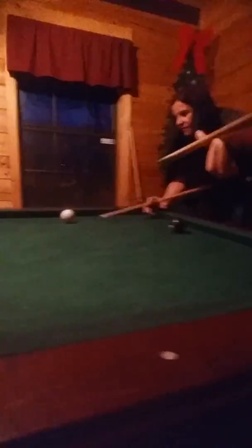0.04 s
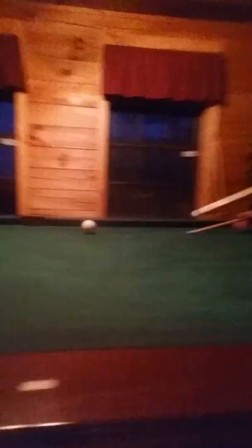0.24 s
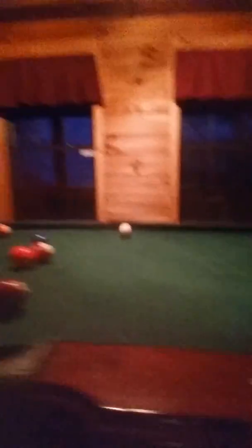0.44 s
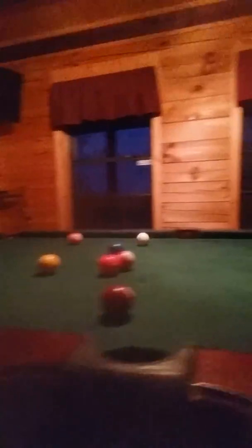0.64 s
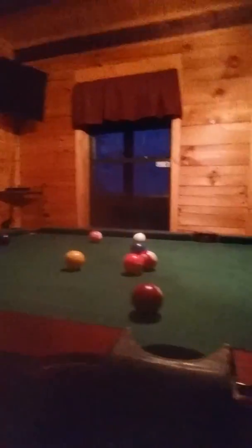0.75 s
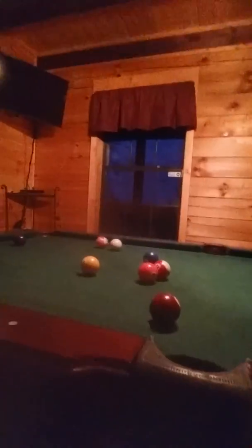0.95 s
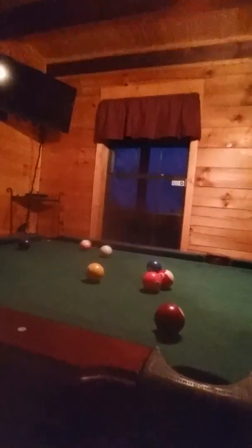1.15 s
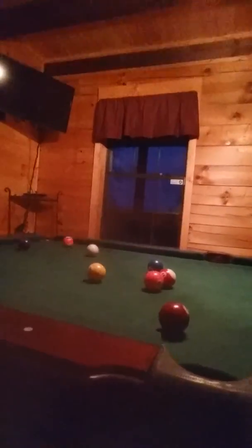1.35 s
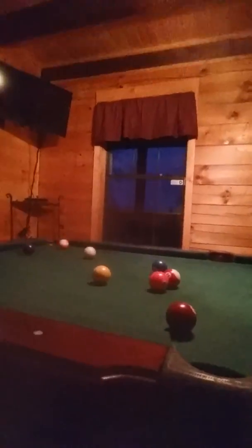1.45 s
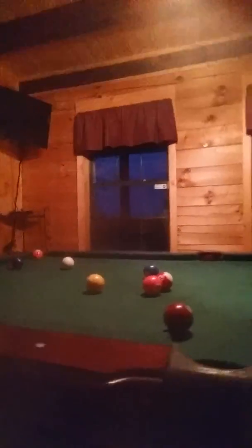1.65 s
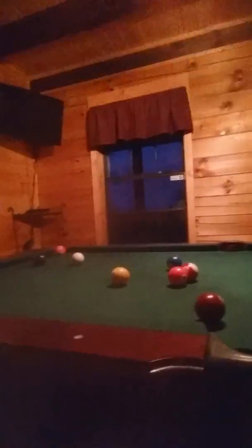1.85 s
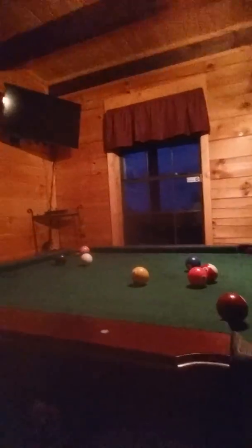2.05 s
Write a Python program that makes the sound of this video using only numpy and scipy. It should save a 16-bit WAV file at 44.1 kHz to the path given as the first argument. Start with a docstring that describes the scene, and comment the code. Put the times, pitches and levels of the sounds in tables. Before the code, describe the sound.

Sharp cue strike on a pool ball, low rolling, then one hard ball-on-ball click in a wooden room

```python
"""In a wood-panelled room, a pool table is heard through a hand-held phone.
A cue's blow rings through table and room, a ball rolls on the slate, clicks against another, and one thuds
into a cushion. Blows and clicks are short pulses with fading tones; cracks and room are shaped, dying noise.
Close to the phone, dry ticks are tiny fading tones with a noise snap. Underneath lie a rolling rumble made
of a wavering hum and filtered noise, steady microphone hiss, and thin whistles that come and go."""
import sys
import numpy as np
from scipy import signal
from scipy.fft import rfft, irfft
from scipy.io import wavfile
from scipy.ndimage import uniform_filter1d

SR = 44100
rng = np.random.default_rng(int(sys.argv[2]) if len(sys.argv) > 2 else 0)


def natural_amplitude(level_db):
    """Convert a level in decibels to a linear amplitude factor, elementwise."""
    exponent = np.asarray(level_db, float) / 20
    return 10 ** exponent


def int16_out(signal):
    """Quantize to a 16-bit WAV file."""
    q = np.round(np.clip(np.atleast_2d(signal).T, -1, 1) * 32767)
    wavfile.write(sys.argv[1], SR, q.astype(np.int16))


N = 92169  # length in samples
LEAD = 1024  # spare samples ahead of time zero, for sounds that start just before it

# How fast the room dies away. Each row: pitch in Hz, time to fall 60 dB in seconds.
ROOM_DECAY = [(100, 0.2), (250, 0.55), (600, 0.46), (1200, 0.44), (2500, 0.34), (5000, 0.37), (9000, 0.21),
              (15000, 0.16)]
# How alike left and right are. Each row: pitch in Hz, likeness (1 same, 0 unrelated, below 0 opposed).
LEFT_RIGHT_LIKENESS = [(100, .87), (250, 0.97), (500, 0.57), (1000, -0.11), (4000, 0.025), (12000, 0.33)]
# Rolling balls and room rumble over time.
# Each row: time in seconds, hum level in dB, broad roll level in dB, slate drone level in dB.
ROLL_LEVELS = [(0.298, -58, -61, -39.5), (0.383, -48, -56, -48.5), (.494, -36.5, -59.5, -39.5),
               (.534, -51, -48.5, -48), (.6, -42, -74, -43), (.738, -39.5, -51, -46), (.86, -52, -54, -41),
               (.96, -46, -53.5, -43.5), (1.096, -55, -51.5, -47), (1.243, -47, -56.5, -49.5),
               (1.5, -42, -54.5, -50), (1.676, -50.5, -52.5, -48), (1.731, -70, -56, -51.5),
               (1.802, -35.5, -48, -46.5), (1.86, -36, -51.5, -58.5), (1.98, -64.5, -57.5, -47),
               (2.09, -52.5, -55.5, -50)]
# Colour of the broad roll. Each row: pitch in Hz, relative level in dB.
ROLL_COLOUR = [(25, -28.5), (45, -24), (60, -10), (100, -10.5), (200, -20.5), (350, -19), (520, -14),
               (750, -26.5), (1100, -32.5), (1600, -41.5), (3000, -66.5)]
# Resonances of the slate's drone. Each row: pitch in Hz, width in Hz, relative level in dB.
DRONE_PEAKS = [(122, 13, 4.5), (210.9, 23, -0.5), (254, 25, -3)]
# Colour of the microphone hiss. Each row: pitch in Hz, relative level in dB.
HISS_COLOUR = [(700, -6), (1200, -5), (2000, -5), (3300, -9.5), (4700, -12), (6500, -5.5), (8500, -16.5),
               (11000, -15), (15800, -10.5)]
# Extra treble loss of the hiss. Each row: pitch in Hz, loss in dB before each side's own multiplier.
HISS_LOSS = [(4000, 0.03), (8500, 2), (13000, 0)]
# Thin whistles. Each row: start in seconds, end in seconds, level in dB, pitch in Hz.
WHISTLES = [(0.13, 0.166, -70, 14900), (0.51, .85, -77, 6150), (0.943, 0.973, -85, 6040),
            (1.236, 1.325, -75.5, 6100), (2.057, 2.09, -76, 6140)]
# Dry ticks near the phone.
# Each row: start in seconds, level in dB, pitch in Hz, time to fall 60 dB in seconds, left over right in dB.
TICKS = [(1.5821, -26.5, 5300, 0.0012, -18.5), (1.584, -29, 2760, 0.0031, 6.5),
         (1.5843, -27, 1140, 0.0092, -11.5), (1.5954, -38, 2260, 0.0029, -12.5),
         (1.598, -31.5, 1940, 0.0043, -15.5), (1.5972, -29.5, 1340, 0.0071, -6),
         (1.6, -34, 4660, 0.0011, -15), (1.5982, -53, 10000, .002, -6), (1.974, -55, 6200, 0.0058, 18)]
# Ball on ball. Each row: time in seconds, direct peak in dB, room level in dB, left over right in dB.
CLICKS = [(0.9795, -6, -19.5, 7.5)]
# Colour of the click in the room. Each row: pitch in Hz, relative level in dB.
CLICK_COLOUR = [(500, -22.5), (1000, -11.5), (1400, -6), (2000, -0.5), (2600, -1.5), (3300, -8),
                (4000, -14.5), (4700, -22), (5500, -32), (6200, -46), (7200, -38), (9000, -55.5),
                (11000, -49.5), (15500, -51.5)]
# Parts that ring on: cue shaft twice, slate twice at the landing, slate at the collision, cushion rail twice.
# Each row: start in seconds, pitch in Hz, level in dB before rise and fall, rise in seconds,
# time to fall 60 dB in seconds.
RINGING_PARTS = [(-.002, 1841, -31.5, 0.001, 0.47), (-.002, 4600, -43, 0.0027, 0.28),
                 (.057, 437.6, -8, 0.0027, 0.072), (.068, 320.5, -2, 0.0049, 0.079),
                 (.985, 123.4, -25, 0.012, 0.31), (1.772, 122, -17.5, 0.013, 0.168),
                 (1.768, 593, -42, 0.01, 0.19)]
# Sharp cracks: cue tip, a faint brush, cushion rubber.
# Each row: start in seconds, level in dB, tilt in dB per octave, room build-up in seconds.
CRACKS = [(-.004, -18.5, 1, 0.0034), (.185, -52.5, 3.5, 0.016), (1.764, -53.5, 5, 0.01)]
# Colour of a crack before its tilt. Each row: pitch in Hz, relative level in dB.
CRACK_COLOUR = [(500, 3), (1000, 6), (1400, -8), (2000, -8), (3300, -17.5), (4700, -24.5), (7200, -29),
                (8500, -38), (11000, -40.5), (15500, -36)]
# Dull blows into the table: cue, ball landing after its hop, collision, cushion.
# Each row: start in seconds, table level in dB, room level in dB, direct peak in dB,
# contact in milliseconds, swell of the table's tones in cycles.
BLOWS = [(.0007, -35, -19.5, -4, 1.928, 0.89), (.056, -26.5, -20.5, -53, 2.24, 3.9),
         (0.979, -43.5, -42.5, -56.5, 3.94, 2.1), (1.766, -53, -45, -71, 3.13, 1.8)]
# Table and room tones rung by every blow.
# Each row: pitch in Hz, relative level in dB, time to fall 60 dB in seconds.
TABLE_MODES = [(60.2, -4.5, .5), (122, -2.5, 0.38), (156.7, -5.5, 0.59), (194.1, -4.5, 0.43),
               (237.1, -10, 0.34), (325, -0.5, .16), (456.6, 1, 0.15), (574, 0, 0.092), (692, -10.5, 0.44)]


def over_hz(table, hz):
    """Read a (Hz, value) table, with straight lines between rows on a log pitch axis."""
    rows = np.array(table, float)
    return np.interp(np.log(hz + 1), np.log(rows[:, 0]), rows[:, 1])


def shape(x, gain):
    """Filter a sound by a gain that depends on pitch in Hz."""
    return irfft(rfft(x) * gain(np.fft.rfftfreq(x.shape[-1], 1 / SR)), x.shape[-1])


def unit(x):
    """Scale to an rms (average strength) of 1."""
    return x / np.sqrt(np.mean(x ** 2))


def pan(db):
    """Left and right gains; db is how much louder left is than right."""
    return natural_amplitude(np.array([[db / 2], [-db / 2]]))


def resonance(hz, width_hz):
    """Gain that peaks at one pitch and falls away on both sides."""
    return lambda f: 1 / np.sqrt(1 + ((f - hz) / (width_hz / 2)) ** 2)


def noise(n):
    """Stereo noise from a shared and an opposed part, mixed by the left-right likeness at each pitch."""
    like = lambda f: np.clip(over_hz(LEFT_RIGHT_LIKENESS, f), -1, 1)
    mid = shape(rng.standard_normal(n), lambda f: np.sqrt((1 + like(f)) / 2))
    side = shape(rng.standard_normal(n), lambda f: np.sqrt((1 - like(f)) / 2))
    return np.array([mid + side, mid - side])


def wavering_tone(hz, wander_hz):
    """A sine whose pitch drifts slowly and randomly; wander_hz is the rms drift."""
    wander = unit(shape(rng.standard_normal(N), resonance(0, 9.7)))
    return np.sin(2 * np.pi * np.cumsum(hz + wander_hz * wander) / SR)


def room(colour=None, build_s=0.004):
    """Dense reflections: they build up, then each half-octave dies at its own rate."""
    gap_s = 0.00057  # silence before the first reflection
    t = np.arange(SR) / SR
    source = noise(SR)
    out = 0
    for k in range(20):
        hz = 30 * 2 ** (k / 2)
        band = shape(source, lambda f: np.clip(1 - 2 * np.abs(np.log2((f + 1) / hz)), 0, 1))
        out = out + band * natural_amplitude(-60 * t / over_hz(ROOM_DECAY, hz))
    out = out * (1 - np.exp(-np.clip(t - gap_s, 0, None) / build_s))
    if colour:
        out = shape(out, lambda f: natural_amplitude(over_hz(colour, f)))
    # the loudest stretch of 1000 samples gets rms 1
    return out / np.sqrt(np.max(uniform_filter1d(np.mean(out ** 2, axis=0), size=1000)))


def add(out, s, x):
    """Mix x in at s seconds."""
    i = int(round(s * SR)) + LEAD
    n = min(x.shape[-1], out.shape[-1] - i)
    out[:, i:i + n] += x[:, :n]


def hiss():
    """Microphone hiss: steady coloured noise, with more treble loss on the right."""
    sides = []
    for x, times in zip(noise(N), (2, 3)):
        sides.append(shape(x, lambda f: natural_amplitude(over_hz(HISS_COLOUR, f) - times * over_hz(HISS_LOSS, f))))
    return natural_amplitude(-68) * unit(np.array(sides))


def whistles():
    """Thin, slightly wavering sines that fade in and out over 600 samples."""
    t = np.arange(N) / SR
    out = 0
    for start, end, db, hz in WHISTLES:
        level = uniform_filter1d(natural_amplitude(db) * ((t > start) & (t < end)), size=600)
        out = out + level * wavering_tone(hz, wander_hz=15)
    return pan(11.5) * out


def rolling():
    """Balls rolling and room rumble: a low hum, broad noise and resonant noise, each with moving levels."""
    hum_hz = 66.84
    hum_noise = unit(shape(noise(N), lambda f: resonance(hum_hz, 22)(f) ** 2))
    hum = unit(wavering_tone(hum_hz, wander_hz=1.7) + natural_amplitude(-7.5) * hum_noise)
    roll = unit(shape(noise(N), lambda f: natural_amplitude(over_hz(ROLL_COLOUR, f))))
    drone = unit(sum(natural_amplitude(db) * unit(shape(noise(N), resonance(hz, width_hz)))
                     for hz, width_hz, db in DRONE_PEAKS))
    t = np.arange(N) / SR
    levels = np.array(ROLL_LEVELS)
    out = 0
    for k, layer in enumerate((hum, roll, drone)):
        out = out + layer * natural_amplitude(np.interp(t, levels[:, 0], levels[:, k + 1]))
    return out


def ticks(out):
    """Tiny damped rings with a broad snap and no room, reaching the right microphone first."""
    left_lag_s, snap_db = 0.0005, -24
    t = np.arange(2000) / SR
    for s, db, hz, t60, pan_db in TICKS:
        ring = np.sin(2 * np.pi * hz * t) * (1 - np.exp(-t * hz / 0.33))
        snap = natural_amplitude(snap_db) * rng.standard_normal((2, len(t))) * np.exp(-t / 0.00037)
        tick = -pan(pan_db) * natural_amplitude(db - 60 * t / t60) * (ring + snap)
        add(out[:1], s + left_lag_s, tick[:1])
        add(out[1:], s, tick[1:])


def clicks(out):
    """Hard balls: a pulse of one and a half cycles, a short ring off the slate, then the room."""
    pulse_hz, pulse_s = 2730, 0.00015
    ring_hz, ring_db, ring_t60 = 2040, 2.5, 0.0067  # level relative to the pulse, before the rise
    t = np.arange(-64, 64) / SR  # zero is the middle of the pulse
    u = np.arange(2000) / SR
    pulse = -np.cos(2 * np.pi * pulse_hz * t + 0.15) * np.exp(-(t / pulse_s) ** 2 / 2)
    for s, db, room_db, pan_db in CLICKS:
        add(out, s + t[0], natural_amplitude(db) * pan(pan_db) * pulse)
        ring = natural_amplitude(db + ring_db - 60 * u / ring_t60) * np.sin(2 * np.pi * ring_hz * u)
        add(out, s + 0.00032, ring[None] * (1 - np.exp(-u / 0.0012)))
        # the room fills slowly from the far end of the table
        add(out, s, natural_amplitude(room_db) * room(CLICK_COLOUR, build_s=0.005))


def ringing_parts(out):
    """Cue shaft, slate and rail ring on: each tone swells, then fades, with random phase between sides."""
    t = np.arange(SR // 2) / SR
    for s, hz, db, rise_s, t60 in RINGING_PARTS:
        phase = (1 - over_hz(LEFT_RIGHT_LIKENESS, hz)) / 2 * rng.random((2, 1))  # in cycles
        level = natural_amplitude(db - 60 * t / t60) * (1 - np.exp(-t / rise_s)) ** 2
        add(out, s, level * np.sin(2 * np.pi * (hz * t + phase)))


def cracks(out):
    """Bright part of a blow, heard through the room; the tilt pivots at 1 kHz."""
    for s, db, tilt_db, build_s in CRACKS:
        colour = [(hz, level + tilt_db * np.log2(hz / 1000)) for hz, level in CRACK_COLOUR]
        add(out, s, natural_amplitude(db) * room(colour, build_s))


def table_ring(t, swell):
    """The table's tones; each swells over a number of cycles, so low ones come late, then fades."""
    out = 0
    for hz, db, t60 in TABLE_MODES:
        # left and right differ more at high pitch: 0.29 cycles at 1 kHz
        spread = 0.29 * np.sqrt(hz / 1000) * rng.standard_normal((2, 1))
        level = natural_amplitude(db - 60 * t / t60) * (1 - np.exp(-t * hz / swell)) ** 2
        out = out + level * np.sin(2 * np.pi * (hz * t + rng.random() + spread))
    return out


def blows(out):
    """A soft push: heard directly, through the table's tones and through the room."""
    t = np.arange(SR) / SR
    for s, table_db, room_db, direct_db, contact_ms, swell in BLOWS:
        hump = np.sin(np.pi * np.clip(t[:800] / (contact_ms / 1000), 0, 1)) ** 2
        push = np.diff(hump)[None]
        body = natural_amplitude(table_db) * table_ring(t, swell) + natural_amplitude(room_db) * room()
        add(out, s, signal.fftconvolve(body, push / np.sqrt(np.sum(push ** 2)), axes=1))
        add(out, s, natural_amplitude(direct_db) * push / push.max())


def scene():
    """The steady background with every struck sound mixed in."""
    out = np.zeros((2, N + LEAD))
    for source in (ticks, clicks, ringing_parts, cracks, blows):
        source(out)
    return hiss() + whistles() + rolling() + out[:, LEAD:]


def low_pass(x):
    """Removes everything above the highest recorded frequency."""
    return signal.sosfilt(signal.butter(12, 15830, fs=SR, output="sos"), x)


def record(dry):
    """The phone cuts the deepest bass, below about 50 Hz."""
    bass_cut = signal.butter(3, 50, "high", fs=SR, output="sos")
    mix = signal.sosfilt(bass_cut, dry)
    return low_pass(mix)


dry = scene()
out = record(dry)
int16_out(out)
```